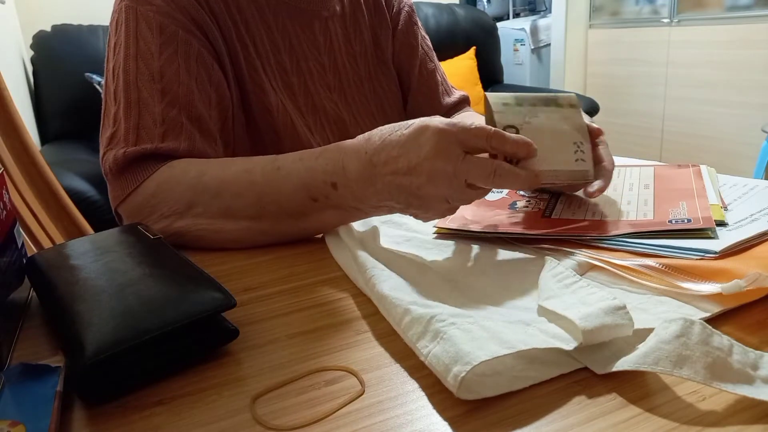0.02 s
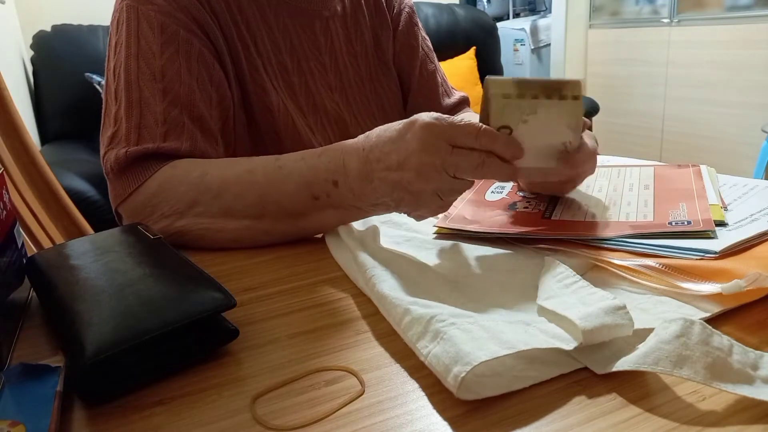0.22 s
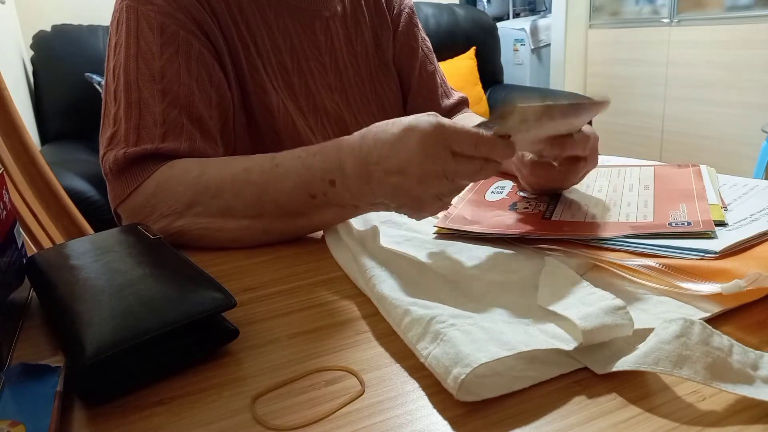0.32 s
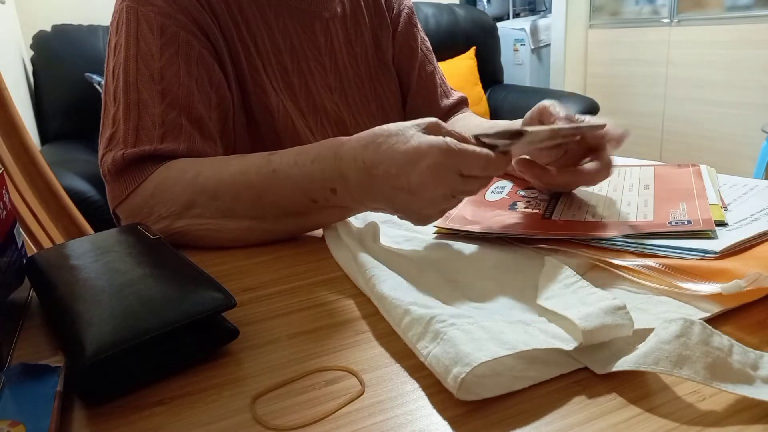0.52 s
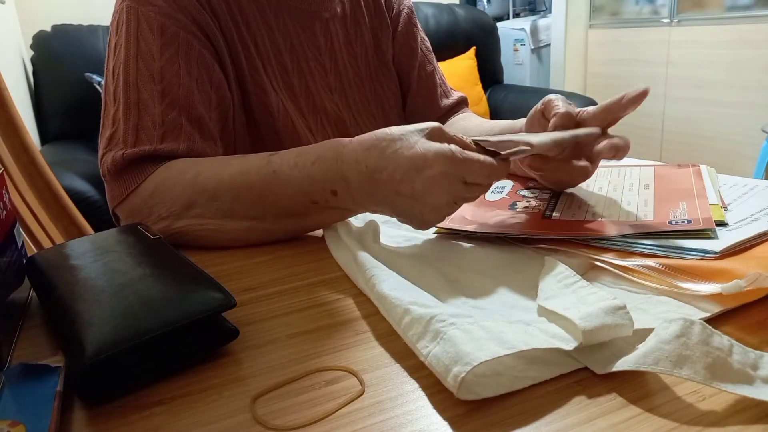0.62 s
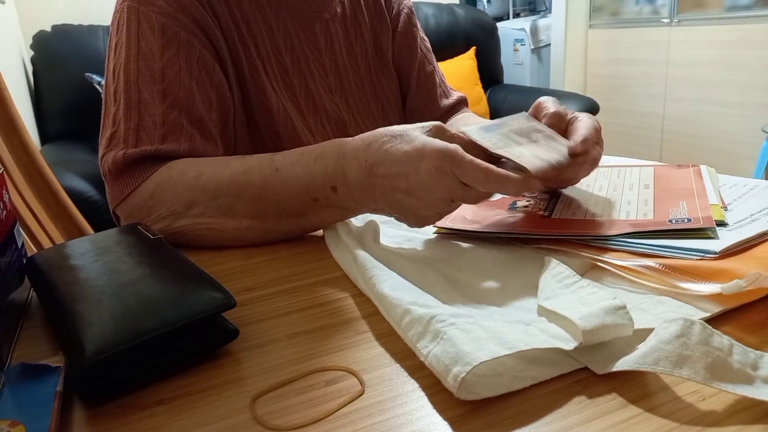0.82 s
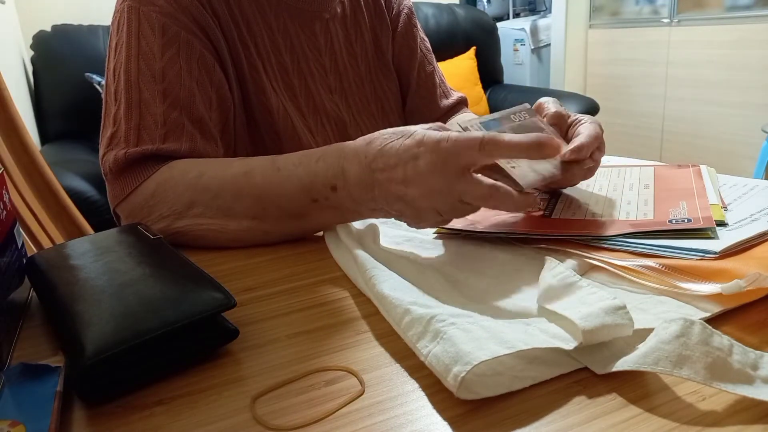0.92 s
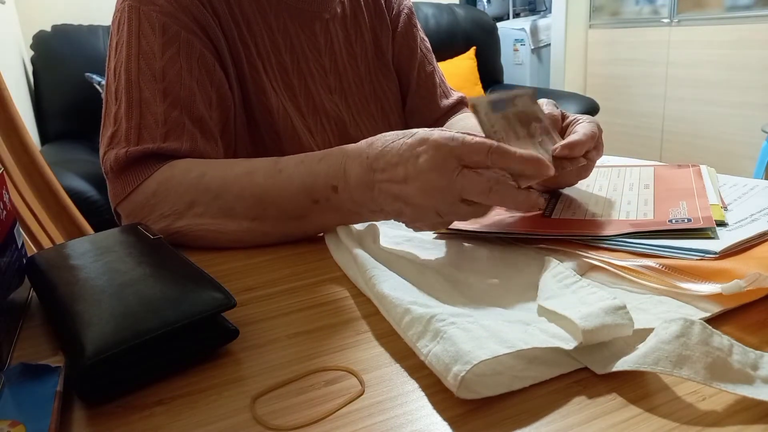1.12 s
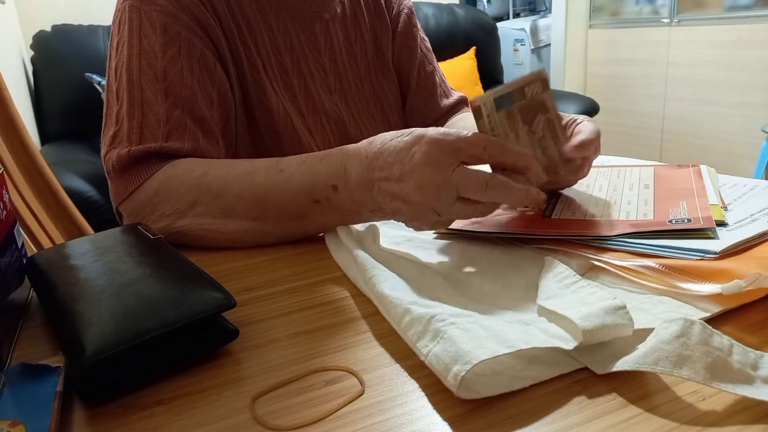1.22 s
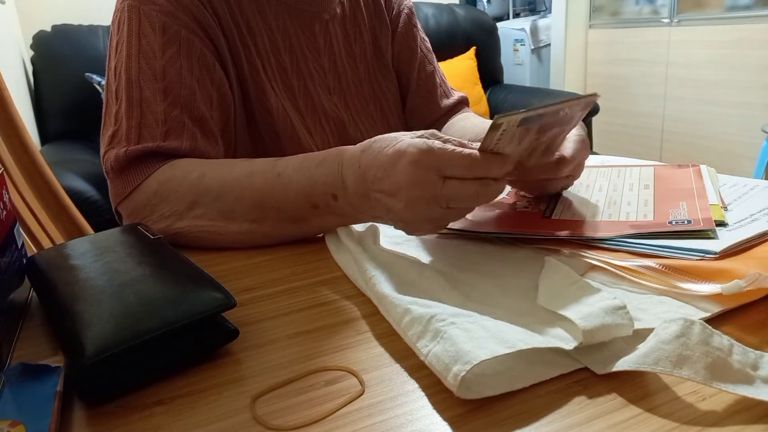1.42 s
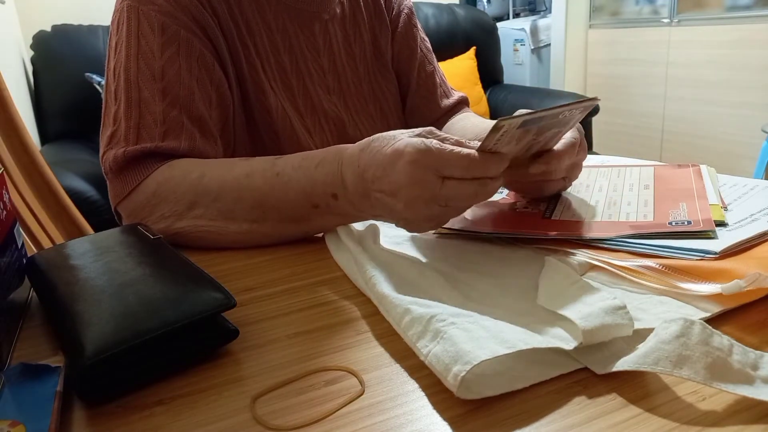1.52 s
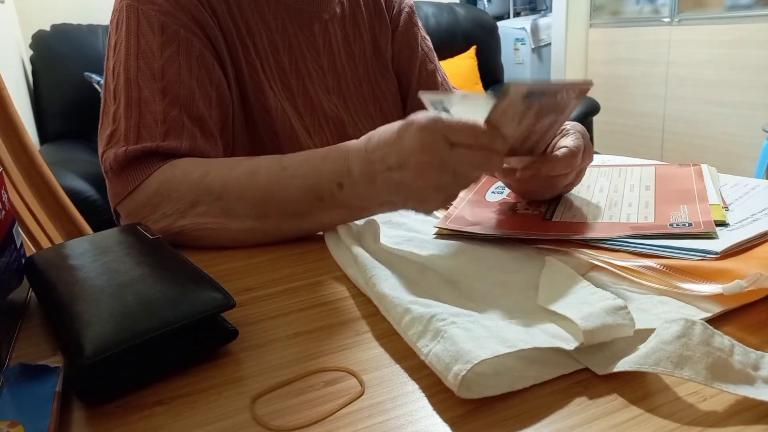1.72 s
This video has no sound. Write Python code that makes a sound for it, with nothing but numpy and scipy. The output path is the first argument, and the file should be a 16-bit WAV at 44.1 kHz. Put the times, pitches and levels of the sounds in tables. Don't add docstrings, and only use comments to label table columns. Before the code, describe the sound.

Close stereo pickup in a small room: papers rustle and knock together, land with a loud hollow slap and rapid bounces on wood, then a light shuffle and a few soft taps over low appliance rumble.

```python
import sys
import numpy as np
from scipy import signal
from scipy.fft import rfft, irfft
from scipy.io import wavfile
from scipy.ndimage import uniform_filter1d, map_coordinates

SR = 44100
rng = np.random.default_rng(int(sys.argv[2]) if len(sys.argv) > 2 else 0)


def wav_record(signal):
    frames = np.transpose(np.atleast_2d(signal))
    bounded = np.clip(frames, -1, 1)
    quanta = np.round(bounded * 32767).astype(np.int16)
    wavfile.write(sys.argv[1], SR, quanta)


def ratio(d):
    e = np.asarray(d, float) / 20
    return 10 ** e


N = 79380

# (frequency [Hz], level [dB])
CRACK_SPECTRUM = [(900, -12), (1400, 6), (1850, -11), (2300, -3), (3100, -1), (4200, -3.5), (6500, -6),
                  (7800, -15)]
# (frequency [Hz], level [dB])
FIZZ_SPECTRUM = [(7000, -27), (8500, -13), (10000, -4), (11800, 0), (13500, -10.5), (14900, -3.5),
                 (15600, -21.5), (16600, -62)]


def unit(x):
    return x / np.sqrt(np.mean(x ** 2) + 1e-20)


def along(points, hz):
    f, v = np.transpose(points)
    return np.interp(np.log(hz + 1), np.log(f + 1), v)


def curve(rows):
    return np.interp(np.arange(N) / SR, *np.transpose(rows))


def wobble(rate_hz):
    knots = rng.standard_normal(int(N * rate_hz / SR) + 4)
    return map_coordinates(knots, [np.arange(N) * rate_hz / SR])


def spectrum_gain(spectrum, hz):
    return ratio(along([(5, -120), *spectrum, (21000, -120)], hz))


def stereo_turn(alike, hz):
    return np.arccos(np.clip(along(alike, hz), -1, 1)) / 2


def coloured(spectrum, size, alike=((1, 0), (2, 0))):
    hz = np.fft.rfftfreq(size, 1 / SR)
    turn = stereo_turn(alike, hz)
    z = rfft(rng.standard_normal((2, size))) * spectrum_gain(spectrum, hz)
    mid, side = irfft(z * [np.cos(turn), np.sin(turn)], size)
    return unit(np.array([mid + side, mid - side]))


def hiss():
    # (frequency [Hz], density [dB per Hz])
    hiss_spectrum = [(500, -19.5), (700, -7.5), (1040, -7), (2120, -15), (3940, -20), (7520, -28),
                     (15200, -20), (16000, -48)]
    return ratio(-78.5) * coloured(hiss_spectrum, size=N)


def appliance_rumble():
    # (time [s], level [dB])
    rumble_level = [(0.0, -53.5), (0.33, -50.5), (0.47, -47.5), (0.65, -59.5), (0.886, -58), (1.042, -57.5),
                    (1.554, -61.5), (1.8, -58.5)]
    # (frequency [Hz], density [dB per Hz])
    rumble_spectrum = [(25, -42), (45, -22), (75, 1), (119, -9.5), (184, -2), (300, -9.5), (450, -13.5),
                       (680, -39.5)]
    # (frequency [Hz], left-right likeness [0..1])
    rumble_alike = [(60, 0.89), (180, 0.93), (300, 0.96), (600, 0), (1500, 0)]
    level_db = curve(rumble_level) + 2 + 2 * wobble(5.9) + 1.5 * wobble(22)
    return ratio(level_db) * coloured(rumble_spectrum, size=N, alike=rumble_alike)


def air_leak():
    # (time [s], level [dB])
    leak_level = [(0, -76), (.7, -83), (.8, -75.5), (.86, -77.5), (1.25, -84), (1.55, -96.5), (1.68, -81),
                  (1.8, -83)]
    # (frequency [Hz], level [dB])
    leak_spectrum = [(3500, -22), (4800, -13), (5800, -8), (6500, 1.5), (7200, -9), (8500, -27)]
    return ratio(curve(leak_level) + 2.3 * wobble(14)) * coloured(leak_spectrum, size=N)


def room(x):
    # (frequency [Hz], t60 [s])
    room_t60 = [(100, 0.33), (500, .3), (2000, 0.28), (6000, 0.38), (14000, .3)]
    # (frequency [Hz], left-right likeness [0..1])
    room_alike = [(150, 1), (350, .6), (700, 0), (10000, 0)]
    build_up_s = 0.0061
    hz, t, z = signal.stft(rng.standard_normal((2, SR // 2)), SR, nperseg=256)
    turn = stereo_turn(room_alike, hz)[:, None]
    mid, side = z[0] * np.cos(turn), z[1] * np.sin(turn)
    fade = ratio(-60 * t / along(room_t60, hz)[:, None])
    tail = signal.istft(np.array([mid + side, mid - side]) * fade, SR, nperseg=256)[1]
    tail = tail * (1 - np.exp(-np.arange(tail.shape[1]) / SR / build_up_s))
    return signal.fftconvolve(x[None], tail / np.linalg.norm(tail[0]), axes=1)


def smooth(spectrum, like):
    hz = np.fft.rfftfreq(len(like), 1 / SR)
    pulse = irfft(spectrum_gain(spectrum, hz), len(like))
    return np.roll(unit(pulse), SR // 400) * np.sqrt(np.mean(like ** 2))


def to_walls(crack, fizz, ring, thud, upper_mode_db):
    # (frequency [Hz], level [dB])
    body_spectrum = [(550, -31.5), (720, -8), (850, 3), (1150, 0), (1400, -15), (1800, -31)]
    # (frequency [Hz], level [dB])
    upper_spectrum = [(1900, -28), (2200, -1.5), (2400, -2.5), (2650, -7.5), (3000, -28)]
    far = smooth(CRACK_SPECTRUM, crack[0]) + smooth(FIZZ_SPECTRUM, fizz[0])
    far = far + ratio(-3.5) * smooth(body_spectrum, ring)
    far = far + ratio(1 + upper_mode_db) * smooth(upper_spectrum, ring)
    return far + ratio(-8.5) * ring + ratio(-2) * thud


def ringing(hz, db, t60_s, t):
    pitch_hz = hz * (1 + 0.032 * rng.standard_normal())
    fade = ratio(db + rng.standard_normal() - 60 * (t / t60_s) ** 1.767)
    onset = 1 - np.exp(-t / 0.0011)
    return fade * onset * np.sin(2 * np.pi * pitch_hz * t)


def board_thud(db, t):
    # (frequency [Hz], level [dB], t60 [s])
    board_modes = [(467.8, 7, 0.019), (217.6, -8, .07), (358, -11.5, 0.092), (170.4, -11.5, 0.046),
                   (115.6, -19, 0.089)]
    return sum(ringing(hz, db + mode_db, t60_s, t) for hz, mode_db, t60_s in board_modes)


def hollow_ring(db, hollow_hz, upper_db, t):
    modes = [(hollow_hz, 0), (hollow_hz * 1.25, -10.5), *zip((1461, 2276), upper_db)]
    t60_s, damping = 0.025, 0.58
    return sum(ringing(hz, db + mode_db, t60_s * (hollow_hz / hz) ** damping, t) for hz, mode_db in modes)


def paper_burst(spectrum, db, alike, t):
    t60_s, rise_s, lumps_db = 0.014, 0.0007, 2
    burst = rfft(coloured(spectrum, size=len(t), alike=alike))
    bins = burst.shape[1]
    lumps = uniform_filter1d(rng.standard_normal(bins), size=bins // 30)
    burst = unit(irfft(burst * ratio(lumps_db * unit(lumps)), len(t)))
    return ratio(db - 60 * t / t60_s) * (1 - np.exp(-t / rise_s)) * burst


def sheet_slide(crack_db, fizz_db, size):
    slide_db, t60_s, rise_s = -16.5, 0.14, 0.0013
    t = np.arange(size) / SR
    grains = unit(ratio(6 * wobble(150)[:size]))
    sheets = ratio(crack_db) * coloured(CRACK_SPECTRUM, size=size, alike=((1, .4), (2, 0.27)))
    sheets = sheets + ratio(fizz_db) * coloured(FIZZ_SPECTRUM, size=size)
    return ratio(slide_db - 60 * t / t60_s) * (1 - np.exp(-t / rise_s)) * grains * sheets


def knocks(rows, hollow_hz, pan_db, room_db, upper_db):
    right_lag = round(0.00045 * SR)
    out, t = np.zeros((2, N + SR)), np.arange(SR // 8) / SR
    side_db = np.array([[pan_db / 2], [-pan_db / 2]])
    for s, crack_db, ring_db, fizz_db, thud_db in rows:
        crack_db, ring_db, fizz_db, thud_db = crack_db - 4, ring_db + 4.5, fizz_db + 6.5, thud_db + 2
        crack = paper_burst(CRACK_SPECTRUM, crack_db, ((1, .8), (2, .8)), t)
        fizz = paper_burst(FIZZ_SPECTRUM, fizz_db, ((1, .6), (2, 1.0)), t)
        ring = hollow_ring(ring_db, hollow_hz, upper_db, t)
        thud = board_thud(thud_db, t)

        near = ratio(side_db) * (crack + fizz + ring) + ratio(-0.35 * side_db) * thud
        near = np.pad(near, ((0, 0), (0, len(t))))
        near = near + ratio(side_db) * sheet_slide(crack_db, fizz_db, size=2 * len(t))
        wet = ratio(room_db) * room(to_walls(crack, fizz, ring, thud, upper_db[-1]))

        at = round(s * SR)
        out[0, at:at + near.shape[1]] += near[0]
        out[1, at + right_lag:][:near.shape[1]] += near[1]
        out[:, at:at + wet.shape[1]] += wet
    return out[:, :N]


def scene():
    # (time [s], crack [dB], hollow ring [dB], fizz [dB], thud [dB])
    shuffle_knocks = [(.0094, -41, -59.5, -63.5, -66), (.0451, -28.5, -38.5, -41, -50),
                      (.0563, -42.5, -41, -53, -46.5), (.1297, -36, -47.5, -62.5, -48.5),
                      (.1405, -43, -43, -63, -52), (.1894, -22.5, -34.5, -40.5, -47),
                      (.2046, -32, -36, -45, -43.5), (.2234, -34, -34.5, -44.5, -41),
                      (.2735, -29, -56, -41.5, -52.5), (.2805, -28.5, -39, -50, -48.5),
                      (.3047, -27, -42.5, -54, -53.5), (.3175, -29.5, -52.5, -45, -55),
                      (.5741, -34, -40.5, -56.5, -57.5), (.5974, -53, -44.5, -53.5, -56.5),
                      (.585, -36.5, -62, -50.5, -71)]
    drop_knocks = [
        (.3342, -10, -16.5, -32.5, -23.5),
        (.3452, -26.5, -31, -43.5, -35),
        (.3797, -14, -25.5, -43, -31),
        (.3914, -36.5, -52, -42.5, -28.5),
        (.4075, -20.5, -29, -46, -38.5),
        (.4113, -28, -33, -52.5, -31.5),
        (.4245, -32.5, -23.5, -45, -40),
        (.4374, -19, -33, -51.5, -37),
        (.451, -37.5, -35, -53, -43.5),
    ]
    tap_knocks = [
        (.8735, -50.5, -47, -76, -64),
        (.8811, -48.5, -42, -69, -62.5),
        (.9183, -44, -43, -85, -53),
        (.9254, -50, -49.5, -75, -54.5),
        (1.0237, -57, -53, -83, -65),
        (1.0440, -32.5, -39, -58.5, -52),
        (1.0584, -44.5, -45, -61.5, -65),
    ]
    shuffle = knocks(shuffle_knocks, hollow_hz=864.5, pan_db=11.5, room_db=0.5, upper_db=(-11.5, -15.5))
    drop = knocks(drop_knocks, hollow_hz=804, pan_db=9.5, room_db=-3.5, upper_db=(-10, -12.5))
    taps = knocks(tap_knocks, hollow_hz=864, pan_db=12.5, room_db=-3, upper_db=(-20, -14))
    return hiss() + appliance_rumble() + air_leak() + shuffle + drop + taps


def low_pass(x):
    return signal.sosfilt(signal.butter(12, 16600, fs=SR, output="sos"), x)


def record(dry):
    low_hz, top_hz = 54, 15100
    hz = np.fft.rfftfreq(N, 1 / SR)
    loss = np.sqrt(1 + (hz / top_hz) ** 60 + (low_hz / (hz + 1)) ** 4)
    return low_pass(irfft(rfft(dry) / loss, N))


dry = scene()
out = record(dry)
wav_record(out)
```